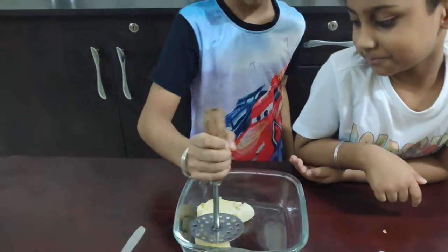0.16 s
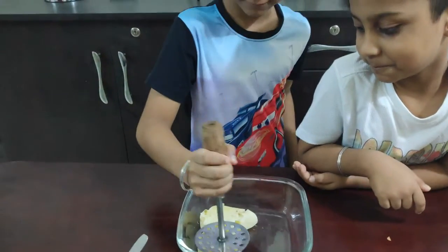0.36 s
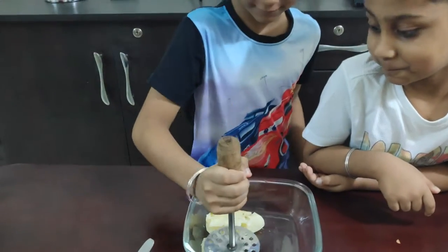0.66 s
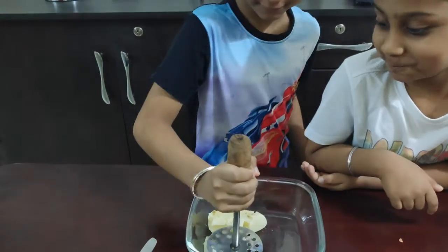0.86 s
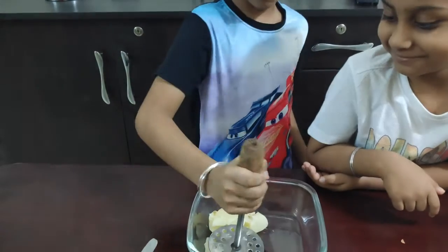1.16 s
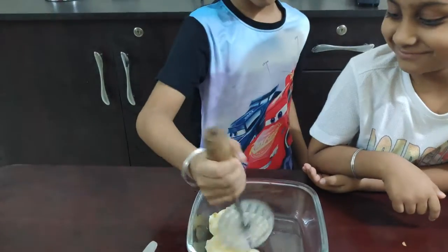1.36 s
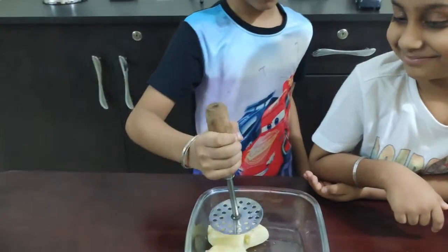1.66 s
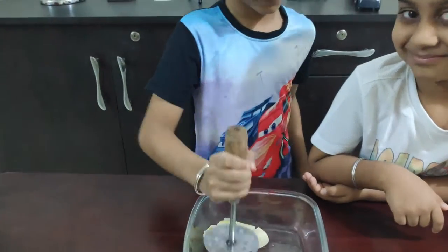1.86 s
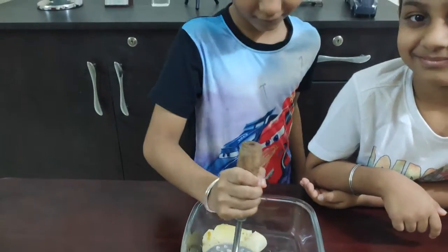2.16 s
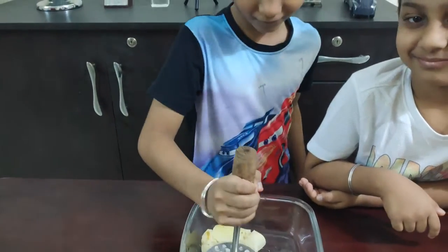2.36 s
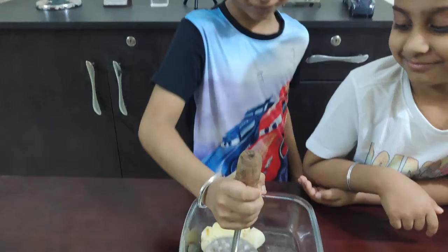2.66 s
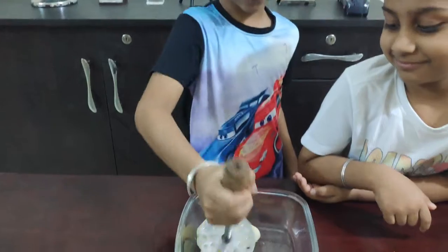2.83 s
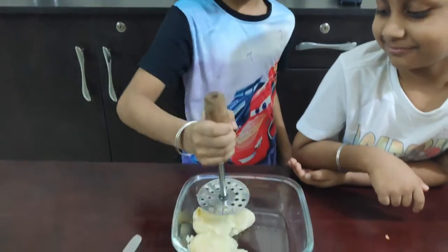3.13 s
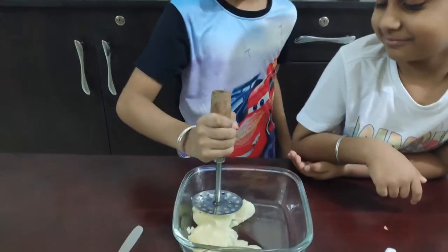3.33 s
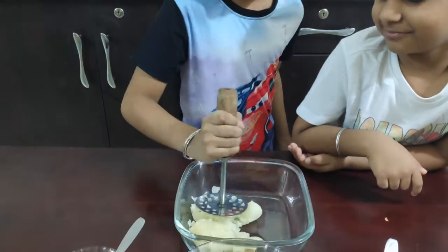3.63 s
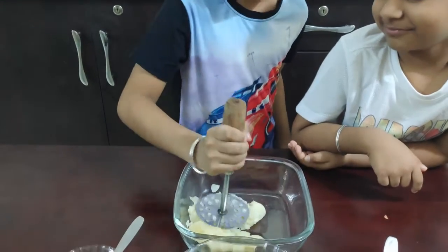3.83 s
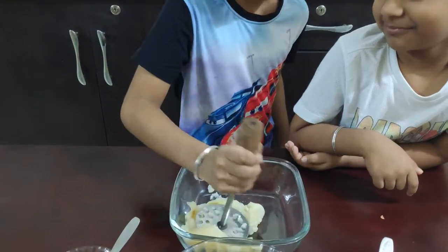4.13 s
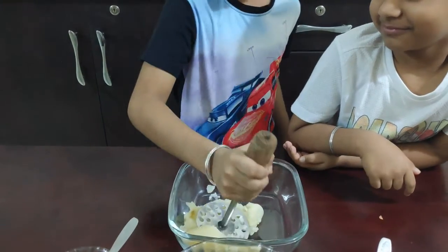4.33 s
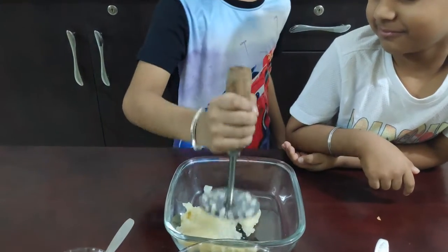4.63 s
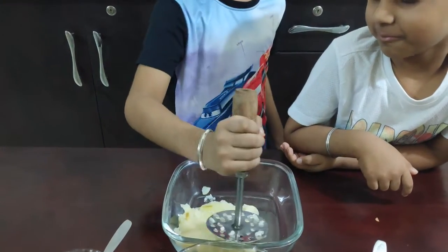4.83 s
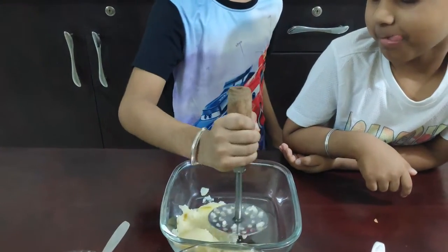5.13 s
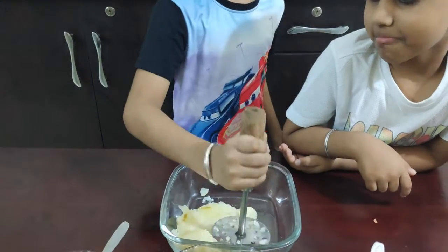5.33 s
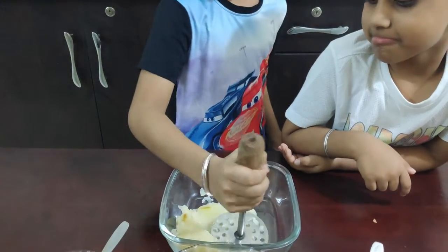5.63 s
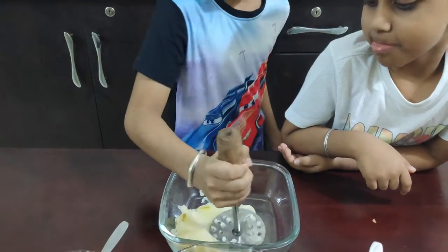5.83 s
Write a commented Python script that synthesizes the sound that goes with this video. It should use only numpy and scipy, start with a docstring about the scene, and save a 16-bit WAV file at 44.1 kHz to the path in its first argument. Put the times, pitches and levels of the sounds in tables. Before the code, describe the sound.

A quiet, hard-walled kitchen, heard close by a phone in stereo, with a deep wavering rumble, low hum and faint steady hiss. At about 0.15 s the bowl rubs dully on the wooden table. From 0.3 to 2 s a steel masher works boiled potato: soft, patchy wet hiss, tiny pops and light sliding on glass, with a muffled clink at 0.9 s and soft table bumps around 1.6-1.75 s. A damped clink and bump at 2.1 s start another squelching spell until 3.1 s. After a lull, a bright, rapid clatter hits the glass base at 3.55 s. From 3.8 to 4.8 s the mashing is wetter, with crisp, louder pops, the strongest near 4.5 s. Following a pause, the loudest event comes at 5.05 s: a hard table thump with a ringing steel clang. Glass-wall taps follow at 5.6 s, then a squish at 5.7 s and softer mashing to the end at 6 s.

```python
"""In a hard-walled kitchen, a steel masher presses boiled potato in a glass bowl on a wooden table, close to a
phone. The potato squelches through the plate: patchy wet hiss strewn with pops, which are short damped sines
with bowl echoes. Steel on glass clinks as crack noise plus damped modes; sliding is shaped noise, and faint
tones swell and fade. Pushes ring and thump the table as damped wood modes and noise, and the bowl drags once on
the wood. Beneath lie a slowly changing deep rumble, a low hum and steady air, all shaped noise."""
import sys
import numpy as np
from scipy import signal
from scipy.fft import rfft, irfft, next_fast_len
from scipy.io import wavfile
from scipy.ndimage import uniform_filter1d

SR = 44100
rng = np.random.default_rng(int(sys.argv[2]) if len(sys.argv) > 2 else 0)


def dump(signal):
    """Clip the signal to [-1, 1] and save it as 16-bit WAV at the path in sys.argv[1]."""
    limited = np.clip(np.atleast_2d(signal).T, -1, 1)
    pcm = np.round(limited * 32767).astype(np.int16)
    wavfile.write(sys.argv[1], SR, pcm)


N = 264159


def amp(db):
    """Gain from decibels."""
    return 10 ** (np.asarray(db) / 20)


def unit(x):
    """x scaled to an rms of 1."""
    return x / np.sqrt(np.mean(x ** 2) + 1e-20)


def along(points, hz):
    """Reads (frequency, value) points on a log frequency axis."""
    f, v = np.transpose(points)
    return np.interp(np.log(hz + 1), np.log(f + 1), v)


def curves(rows):
    """One value per sample for each column after the time."""
    s, *cols = np.transpose(rows)
    return [np.interp(np.arange(N) / SR, s, c) for c in cols]


def filtered(x, response):
    """Multiplies the spectrum of x by a response of frequency."""
    m = next_fast_len(x.shape[-1] + 4096)
    hz = np.fft.rfftfreq(m, 1 / SR)
    return irfft(rfft(x, m) * response(hz), m)[..., :x.shape[-1]]


def sides(points):
    """Left and right gains from a left-right balance, half of it on each side."""
    return lambda hz: amp(along(points, hz) * np.array([[.5], [-.5]]))


# How alike left and right are: (frequency [Hz], correlation [0-1])
ALIKE = [(30, 0.92), (150, 0.97), (380, 0.88), (950, 0.038), (2400, 0.056), (15000, 0.68)]


def paired(pair, spectrum):
    """Turns two unrelated noises into left and right, most alike in the bass."""
    turn = lambda hz: np.arccos(np.clip(along(ALIKE, hz), -1, 1)) / 2
    shape = lambda hz: amp(along(spectrum, hz)) * [np.cos(turn(hz)), np.sin(turn(hz))]
    mid, side = filtered(pair, shape)
    return np.array([mid + side, mid - side])


def rush(spectrum, patchy_db):
    """Stereo noise, rms 1 at the middle, with time-frequency patches of random gain."""
    z = signal.stft(rng.standard_normal((2, N)), nperseg=256)[2]
    field = rng.standard_normal(z.shape[1:])
    field = uniform_filter1d(field, size=12, axis=0)  # smooth over frequency
    field = uniform_filter1d(field, size=6, axis=1)  # smooth over time
    patchy = signal.istft(z * amp(patchy_db * unit(field)), nperseg=256)[1][:, :N]
    pair = paired(patchy, spectrum)
    return pair / np.std(pair.mean(axis=0))


def burst(spectrum, t, t60, apart):
    """A dying stereo noise, partly different at the two ports."""
    noise = rng.standard_normal((2, len(t)))
    a, b = unit(filtered(noise, lambda hz: amp(along(spectrum, hz))))
    return np.array([a + apart * b, a - apart * b]) * amp(-60 * t / abs(t60))


def ring(modes, db, tilt, t, spread_db, skew, blur):
    """Damped modes, tilted in dB per octave; a wandering phase stands for close, beating neighbours."""
    hz, level, t60 = np.transpose(modes)[:, :, None]
    middle_hz = np.median(hz)
    chance = rng.standard_normal((len(modes), 2))
    strength_db = db + level + tilt * np.log2(hz / middle_hz) + spread_db * chance[:, :1]
    size = amp(strength_db - 60 * t / t60)
    steps = rng.standard_normal((len(modes), len(t) // 64 + 1))
    drift = np.cumsum(np.repeat(steps, 64, axis=1)[:, :len(t)], axis=1) / SR
    phase = 2 * np.pi * hz * t + blur * np.sqrt(hz * middle_hz) * drift
    lag = skew * chance[:, 1:] * hz / (hz + 900)  # the two ports hear each mode at their own phase
    return np.array([np.sum(size * np.sin(phase + side * lag), axis=0) for side in (1, -1)])


# Decay of the hard-walled room: (frequency [Hz], t60 [s])
KITCHEN = [(200, 1), (1000, 0.95), (4000, 0.63), (10000, 0.43), (16000, 0.5)]


def kitchen(x, wet_db):
    """Adds a fresh diffuse tail in which each frequency dies at its own speed."""
    hz, t, z = signal.stft(rng.standard_normal((2, SR // 2)), SR, nperseg=256)
    decay = amp(-60 * t / along(KITCHEN, hz)[:, None])
    tail = paired(signal.istft(z * decay, SR, nperseg=256)[1], [(0, 0)])
    tail = np.pad(tail, ((0, 0), (150, 0))) / np.linalg.norm(tail[0])  # 150 samples of pre-delay
    return x + amp(wet_db) * signal.fftconvolve(x, tail, axes=1)[:, :x.shape[1]]


def add(out, s, x):
    """Mixes x in at time s."""
    piece = out[:, round(s * SR):][:, :x.shape[1]]
    piece += x[:, :piece.shape[1]]


# Deep rumble of building and table: (time [s], relative level [dB])
RUMBLE = [(0, -54.5), (.46, -55.5), (1.0, -62.5), (1.47, -65), (2.22, -58), (2.8, -57.5), (3.25, -67),
          (3.8, -58), (4.3, -54.5), (4.7, -60.5), (5.02, -59), (5.99, -64)]
# Colour of the deep rumble: (frequency [Hz], relative density [dB per Hz])
DEEP = [(15, -23.5), (26, -11), (33, 2.5), (38, 0), (45, -35), (75, -43.5), (110, -50.5)]
# Colour of the low hum: (frequency [Hz], relative density [dB per Hz])
HUM = [(35, -79.5), (60, 0), (81, -4.5), (118, 1), (208, -4.5), (269, -6), (612, -18), (700, -38),
       (910, -77), (1540, -120)]
# Colour of room tone and microphone hiss: (frequency [Hz], relative density [dB per Hz])
AIR = [(240, -19), (400, 3), (769, -1), (986, 1.5), (1530, -3), (2360, -1), (2930, -5.5), (4530, -8),
       (15000, -11.5), (16500, -52.5)]
# Balance of diffuse sound: (frequency [Hz], left-right [dB])
AIR_PORTS = [(60, -0.5), (1300, -0.5), (6000, -4), (10000, -2.5), (15000, 16.5)]
HUM_DB, AIR_DB = -66.6, -73


def room_tone():
    """Three shaped noises: a rumble that follows a level curve, a low hum and steady air."""
    rumble = amp(curves(RUMBLE)[0] - 3.5) * rush(DEEP, patchy_db=0.0)
    hum = amp(HUM_DB) * rush(HUM, patchy_db=0.5)
    air = amp(AIR_DB) * rush(AIR, patchy_db=1.0)
    return filtered(rumble + hum + air, sides(AIR_PORTS))


# The bowl dragged a little on the wood: (start [s], length [s], level before muffling [dB])
DRAG = (.14, .22, -59)
# Dense upper modes of the wood, for drag and thuds: (frequency [Hz], relative density [dB per Hz])
THUD = [(40, -27), (85, -8.5), (300, -4.5), (700, -17), (1200, -14), (2500, -40.5)]


def drag():
    """A dull rub in the upper modes of the wood, swelling and fading, its top muffled."""
    s, length, db = DRAG
    u = np.clip((np.arange(N) / SR - s) / length, 0, 1)
    muffled = filtered(rush(THUD, patchy_db=1.5), lambda hz: 1 / (1 + (hz / 600) ** 4))
    return amp(db) * np.sin(np.pi * u) * muffled


# Pushes into the table: (time [s], relative level [dB], hardness as mode tilt [dB per octave])
PUSHES = [(0.352, -46.5, -10), (0.895, -58, 1), (1.641, -51.5, -7), (1.733, -49.5, -3),
          (1.928, -67.5, -15.5), (2.1, -49, -13.5), (3.523, -45.5, 9), (3.548, -55, -7.5),
          (3.556, -35.5, 4.5), (5.05, -18.5, 0.5), (5.577, -35, 2)]
# Table top modes, the swaying legs first: (frequency [Hz], relative level [dB], t60 [s])
TABLE = [(38.7, -3.5, 0.23), (116.5, -0.5, 0.51), (150, 3.5, 0.2), (181.4, -10.5, 0.87),
         (265.5, -2.5, 0.19), (292.5, -18, 0.7), (347, -18, 0.95), (396, -21.5, 0.77), (479, -16.5, 0.57),
         (582, -11.5, 0.27)]
# The whole top giving way: (frequency [Hz], relative level [dB], t60 [s])
BUMP = [(93, 6.5, 0.096)]
SWAY_DB, SWAY_PER_SOFTNESS = -7, 2.6  # the legs sway more under a soft, slow push


def table():
    """Each push rings the wood's modes; a harder push favours higher modes and thuds more."""
    out, t = np.zeros((2, N)), np.arange(SR) / SR
    rise = 1 - np.exp(-t / .005)
    for s, db, hardness in PUSHES:
        sway_db = SWAY_DB - SWAY_PER_SOFTNESS * hardness
        top = ring(TABLE[1:], 0, hardness, t, spread_db=1.2, skew=.3, blur=.06)
        legs = ring(TABLE[:1], sway_db, 0, t, spread_db=1, skew=.3, blur=.2)
        bump = ring(BUMP, 0, 0, t, spread_db=1, skew=.3, blur=0)
        thud = amp(1.15 * hardness - 4.0) * burst(THUD, t, 0.4, apart=0.2)
        add(out, s, amp(db - 8) * (top + legs + bump + thud) * rise)
    return kitchen(out, wet_db=-9.0)


# Plate on glass: (time [s], relative level [dB], landing spot, rattle t60 [s])
CLINKS = [(0.909, -26, "paste", 0.028), (2.105, -21.5, "paste", 0.026), (3.5236, -11.5, "base", 0.034),
          (3.556, -14, "base", 0.044), (3.566, -14.5, "paste", 0.088), (5.049, -12, "edge", 0.012),
          (5.062, -26.5, "edge", 0.21), (5.348, -46, "edge", 0.077), (5.5804, -21.5, "wall", 0.068),
          (5.6016, -24.5, "wall", 0.054), (5.613, -28, "wall", 0.21), (5.684, -44, "wall", 0.03),
          (5.746, -40, "wall", 0.028)]
# What rings at each spot: (base knock [dB], wall ring [dB], plate ring [dB], brightness [dB per octave],
SPOTS = {"paste": (-12, None, None, 0, 0, 1), "base": (3.1, 0, None, -1.1, 0, 1),
         "edge": (None, None, 4.8, 2.8, 0, 1), "wall": (-1.5, 2, -16, -3, 2.3, 1.5)}
# Thick bowl base and its one lasting mode: (frequency [Hz], relative level [dB], t60 [s])
BASE = [(2158, 5, 0.014), (2750, -27.5, .6), (5860, -3, 0.025), (7830, 5.5, 0.014)]
# Bowl wall before the spot retunes it: (frequency [Hz], relative level [dB], t60 [s])
GLASS = [(606, -43, 0.83), (1001, -19, 0.3), (1050, -18.5, 0.064), (1604, -21, 0.14), (3220, -8, 0.019),
         (4410, -21.5, 0.35), (4680, -0.5, 0.013), (6130, 0, 0.015), (6890, -1, 0.025), (8620, 0, 0.039),
         (9830, -5, 0.046), (10000, -5.5, 0.033), (11040, -16.5, 0.16), (13150, -6, 0.04),
         (14950, -20, 0.025)]
# Perforated plate: (frequency [Hz], relative level [dB], t60 [s])
STEEL = [(1030, 4.5, 0.027), (2100, -31.5, 1.1), (2190, -6, 0.029), (3570, -13.5, 0.15), (3720, -19, 0.44),
         (4890, -23, 0.41), (5630, -25.5, 0.25), (6460, -15, 0.19), (6840, -13, 0.1), (7840, -13, 0.11),
         (8510, -3, 0.096), (10280, -12, 0.24), (10620, -14, 0.35), (10700, -17.5, 0.12),
         (11350, -18, 0.35), (12500, -14.5, 0.11), (12780, -17, 0.058), (13360, -11.5, 0.088),
         (13500, -20, .25), (14170, -20, 0.2), (15560, -22.5, 0.091)]
# Contact noise: (frequency [Hz], relative density [dB per Hz])
CRACK = [(130, -18.5), (380, 8), (700, -15.5), (2300, -1.5), (3800, -8.5), (6000, -2.5), (8000, -5.5),
         (9400, -9), (11000, -11.5), (16000, -9.5)]
STIFF_HZ = 5500  # glass modes above this depend on where the plate presses


def pressed_glass(sharp, lasting):
    """Bowl wall modes with the upper ones shifted and stretched by the pressing plate."""
    modes = []
    for hz, level, t60 in GLASS:
        if hz > STIFF_HZ:
            hz, t60 = hz * (1 + sharp / 100), t60 * lasting
        modes.append((hz, level, t60))
    return modes


def clinks():
    """Steel meets glass: a dying rattle of contact noise, with damped modes of base, wall and plate."""
    out, t = np.zeros((2, N)), np.arange(SR * 3 // 4) / SR
    rise = 1 - np.exp(-t / .0016)
    for s, db, spot, rattle in CLINKS:
        base_db, glass_db, steel_db, bright, sharp, lasting = SPOTS[spot]
        glass = pressed_glass(sharp, lasting)
        # modes, level [dB], tilt [dB per octave], skew [rad], blur
        parts = [(BASE, base_db, 0, 1.2, .04), (glass, glass_db, bright, 1.1, .06),
                 (STEEL, steel_db, bright, 1.1, .1)]
        rings = sum(ring(modes, level_db, tilt, t, 1.5, skew, blur)
                    for modes, level_db, tilt, skew, blur in parts if level_db is not None)
        crack = 0.58 * burst(CRACK, t, rattle, apart=0.414)
        add(out, s, kitchen(amp(db - 8.5) * rise * (crack + rings), wet_db=-6.5))
    return out


# Faint steady or falling tones: two thin whistles and a soft push that rings only the table's mode near 182 Hz:
# (start [s], length [s], from [Hz], to [Hz], dry peak level [dB])
TONES = [(1.52, .032, 6420, 6050, -61), (2.37, .14, 183, 181, -59), (3.97, .5, 672, 660, -73)]


def squeak():
    """Thin sine tones with a wandering phase that swell and fade."""
    s, length, from_hz, to_hz, db = np.transpose(TONES)[:, :, None]
    u = np.clip((np.arange(N) / SR - s) / length, 0, 1)
    wander = .015 * np.cumsum(rng.standard_normal(u.shape), axis=1)
    phase = 2 * np.pi * np.cumsum(from_hz + (to_hz - from_hz) * u, axis=1) / SR
    return np.sum(amp(db) * np.sin(np.pi * u) * np.sin(wander + phase), axis=0)


# Spells of working the potato, one curve each: (time [s], wet hiss [dB], plate sliding on glass [dB])
SPELLS = [
    [(.32, -74, -95), (.35, -69.5, -71), (.46, -81, -73.5), (.51, -68, -65.5), (.62, -69, -70.5),
     (.77, -65, -73.5), (.86, -73.5, -77), (.91, -59, -54), (1.06, -74.5, -69.5), (1.13, -64, -62),
     (1.24, -63.5, -63), (1.31, -68, -76.5), (1.38, -64.5, -68), (1.45, -71, -81), (1.56, -66, -73.5),
     (1.7, -75, -73), (1.8, -87, -68.5), (2.0, -106, -77)],
    [(2.15, -66, -67), (2.27, -63.5, -84), (2.37, -62.5, -62.5), (2.47, -73, -71), (2.65, -70.5, -66),
     (2.88, -75.5, -71.5), (2.97, -64, -77), (3.13, -80, -88)],
    [(3.8, -66.5, -71), (4.0, -67.5, -72.5), (4.17, -64, -74.5), (4.23, -61, -62.5), (4.35, -73.5, -74.5),
     (4.44, -65, -86), (4.51, -56, -82), (4.58, -70.5, -71), (4.77, -74.5, -74), (4.85, -95, -100)],
    [(5.65, -71, -74), (5.72, -56, -66), (5.85, -70.5, -85), (5.93, -66, -97), (5.99, -69.5, -75)],
]
FADE_S = 0.092


def effort():
    """Gains of hiss and sliding, fading in just before each spell and out just after it."""
    t = np.arange(N) / SR
    inside = lambda rows: np.clip(np.minimum(t - rows[0][0], rows[-1][0] - t) / FADE_S + 1, 0, 1)
    return sum(amp(curves(rows)) * inside(rows) for rows in SPELLS)


def pops(rows, cycles):
    """Each air pocket bursts as a damped sine of a few cycles with a soft start."""
    s, db, hz = np.transpose(rows)[:, :, None]
    t = np.arange(160) / SR
    u = t * hz / cycles
    wave = amp(db) * np.sin(2 * np.pi * hz * t) * u * np.exp(1 - u)
    at = (np.round(s * SR).astype(int) + np.arange(160)).ravel()
    return np.bincount(at, wave.ravel(), N + 160)[None, :N]


def in_bowl(rows, cycles):
    """The glass walls smear each pop into a few milliseconds of close echoes, which differ by place."""
    t, places = np.arange(SR // 100) / SR, 6
    out = np.zeros((2, N))
    for k in range(places):
        x = pops(rows[k::places], cycles)
        echoes = rng.standard_normal((2, len(t))) * amp(-60 * t / .012)
        echoes /= np.linalg.norm(echoes[0])
        out += x + 1.36 * signal.oaconvolve(x, echoes, axes=1)[:, :N]
    return out


# The loudest air pockets bursting: (time [s], level before echoes [dB], pitch [Hz])
POPS = [(0.3173, -51, 5200), (0.5082, -52, 8900), (0.579, -65, 2450), (0.6696, -44, 12600),
        (0.8982, -47, 5200), (1.3902, -41.5, 8300), (1.425, -54, 7600), (2.2179, -42, 8300),
        (2.3421, -55, 10200), (2.6357, -49.5, 7300), (2.925, -48, 14600), (3.833, -45, 8700),
        (3.8896, -46, 8150), (3.908, -37, 12900), (3.909, -44.5, 8200), (3.9809, -37.5, 14650),
        (4.0176, -39.5, 8600), (4.028, -41, 7750), (4.114, -43, 7800), (4.133, -48, 8350),
        (4.2105, -42.5, 8000), (4.212, -62, 2790), (4.297, -47, 6500), (4.477, -38.5, 12600),
        (4.484, -57, 2450), (4.5035, -34, 7660), (4.512, -39, 7240), (4.514, -61, 1660)]
# Colour of wet potato: (frequency [Hz], relative density [dB per Hz])
HISS = [(2060, -15.5), (3500, -16), (5070, -12.5), (7670, -7), (8910, -11.5), (10400, -14.5), (13000, -9),
        (13800, -11.5), (16000, -17.5)]
# Colour of the plate sliding on glass: (frequency [Hz], relative density [dB per Hz])
SLIDE = [(350, -5.5), (600, -6), (1750, -8), (2250, -1), (2800, -12), (3700, -7.5), (4600, -15),
         (6000, -32)]
# Balance of the two microphones for sounds from bowl and table: (frequency [Hz], left-right [dB])
PORTS = [(60, -2), (700, -1.5), (2400, -2.5), (5000, -3.5), (7500, -6.5), (10000, -2), (12000, 9),
         (16000, 15)]


def mash():
    """Wet hiss strewn with tiny pops, the plate sliding on glass, big pops and faint tones with room tails."""
    flow, rub = effort()
    when, size, pitch = rng.random((2000, 3)).T
    tiny_db = -9.0 * np.log10(size + .02)  # many small pockets, few large
    tiny = in_bowl(np.transpose([when * N / SR, tiny_db, 6200 * 2 ** (1.2 * pitch)]), cycles=0.98)
    big = in_bowl(POPS, cycles=1.3)
    hiss = flow * rush(HISS, patchy_db=1.8) + rub * rush(SLIDE, patchy_db=2.5)
    bursts = flow * amp(-2.0) * unit(tiny) + kitchen(big + squeak(), wet_db=-6.5)
    return filtered(hiss, sides(AIR_PORTS)) + filtered(bursts, sides(PORTS))


def scene():
    """Sums all layers; the right port loses the top octave of knocks, clinks and drag."""
    knocks = filtered(drag() + table() + clinks(), sides(PORTS))
    return room_tone() + knocks + mash()


TOP_HZ = 15720  # band limit


def record(dry):
    """The phone's case dips near 3.7 kHz; next to nothing passes well above the band limit."""
    dip_db = lambda hz: -6.5 * np.exp(-((hz - 3750) / 220) ** 2)
    edge_db = lambda hz: -np.clip((hz - TOP_HZ) / 8, 0, 14) - np.clip((hz - TOP_HZ) / 30, 0, 90)
    return filtered(dry, lambda hz: amp(dip_db(hz) + edge_db(hz)))


dry = scene()
out = record(dry)
dump(out)
```